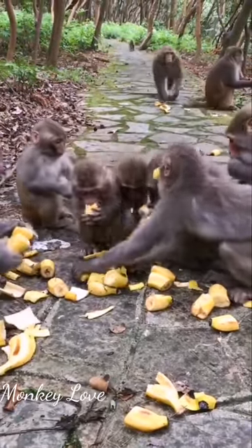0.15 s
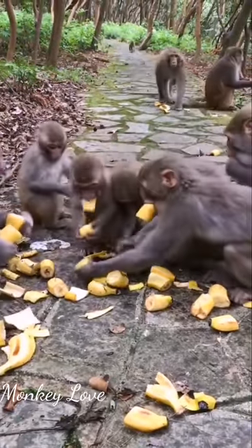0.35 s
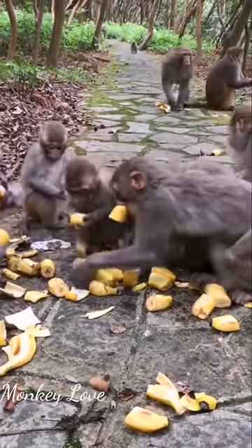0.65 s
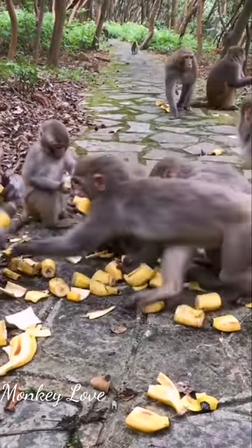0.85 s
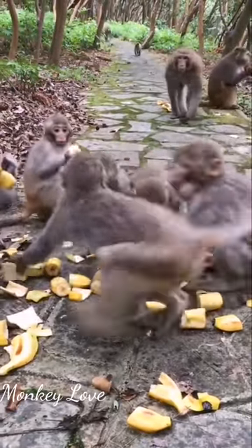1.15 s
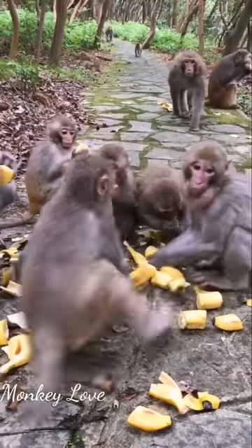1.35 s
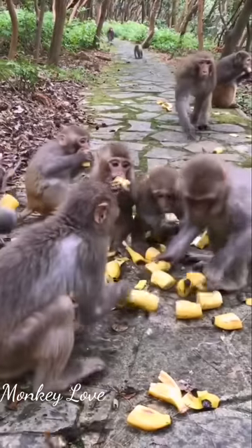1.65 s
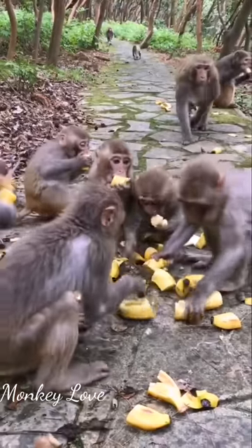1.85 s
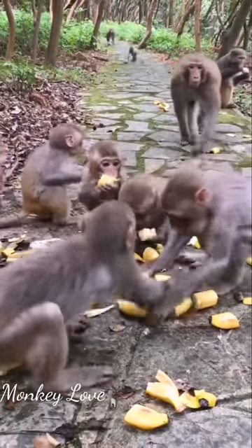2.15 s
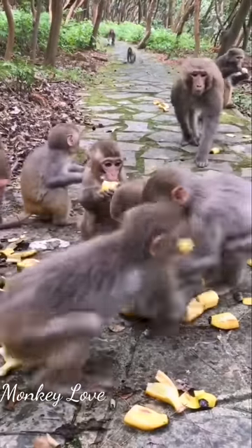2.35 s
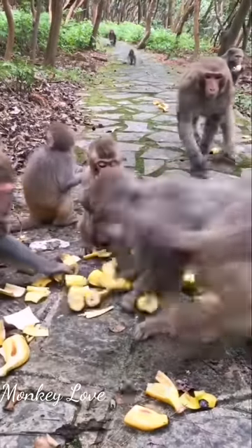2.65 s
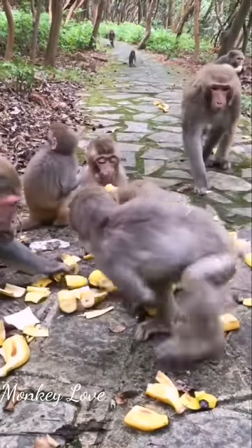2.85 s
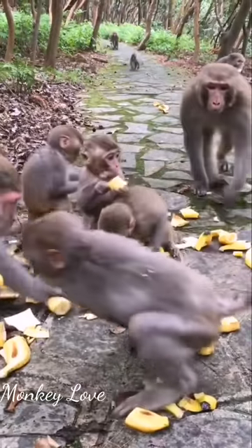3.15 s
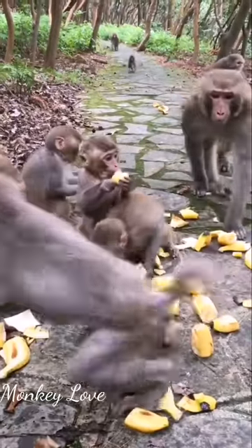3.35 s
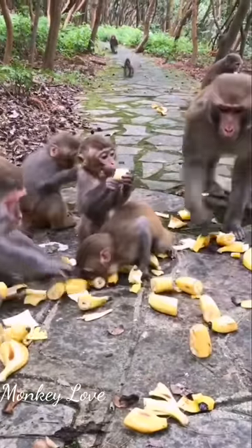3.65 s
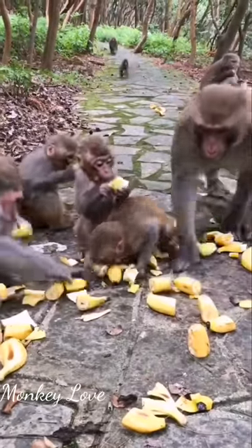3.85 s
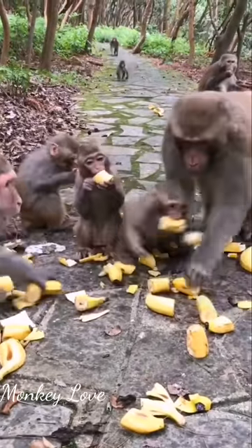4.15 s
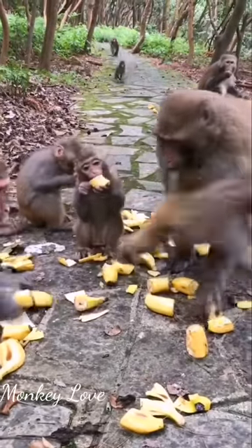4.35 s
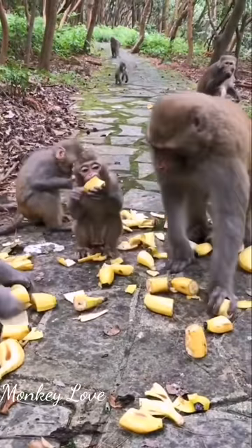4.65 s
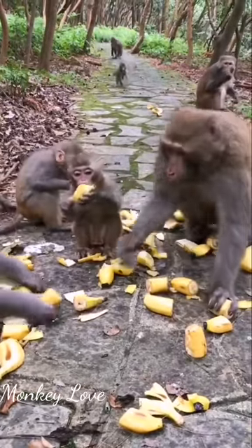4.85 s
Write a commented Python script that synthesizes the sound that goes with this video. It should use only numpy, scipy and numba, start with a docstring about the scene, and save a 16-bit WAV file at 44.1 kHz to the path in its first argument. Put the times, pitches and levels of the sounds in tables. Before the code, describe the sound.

A distant engine idles throughout with a low, throbbing hum under the soft hiss of forest leaves. Close to the microphone, monkeys scuff and shuffle over gritty stone and dry leaves in fits and starts. From about 0.6 to 1.3 seconds one monkey gives a soft, nearly pure coo farther off. Over it, at 0.9 seconds, comes a loud, very short, rasping shriek, followed by quick high squeaks and two dull footfalls. A sharp snap sounds at 1.6 seconds amid heavier shuffling, then two faint squeaks. A thin wavering squeal runs from 2.0 to 2.3 seconds and ends in another squeak. A short harsh bark comes at 3.0 seconds, and another at 3.7 with small squeaks just after. A sharper falling squeak stands out at 4.3 seconds, and light scuffs continue until about 5 seconds.

```python
"""Macaques squabbling on a forest path

Close to the microphone, macaques quarrel over fruit on a stone path. Their squeaks and
shrieks are whistles of the vocal folds that break into a rasp when pressed; in the harsh
little barks, chaotic folds ring the throat. Hands and feet scuff over grit and dry leaves.
Further off one animal coos, and a distant engine idles under the soft hiss of the trees."""
import sys
import numpy as np
from scipy import signal
from scipy.fft import rfft, irfft, next_fast_len
from scipy.io import wavfile
from scipy.ndimage import uniform_filter1d
from numba import njit

SR = 44100
rng = np.random.default_rng(int(sys.argv[2]) if len(sys.argv) > 2 else 0)


def store_wav(level_fs):
    """Save 16-bit WAV to argv[1]."""
    pcm = np.round(np.clip(np.atleast_2d(level_fs), -1, 1) * 32767)
    wavfile.write(sys.argv[1], SR, pcm.T.astype(np.int16))


N = 221173
T = np.arange(N) / SR
RASP_HZ = 990  # slow second vibration of the larynx in rough stretches
TOP_HZ = 15850  # upper edge of the recorder's band


def squeak(t, hz, db, rough, octave_db, air_db, edge_hz, shake_hz=RASP_HZ, shake_depth=0.24):
    """A whistling voice that breaks into a rasp around its first two harmonics when pressed."""
    # resonances of the narrowed throat: (frequency [Hz], width [Hz], gain [dB])
    throat = [(2400, 90, -3.5), (3370, 800, -25), (3880, 780, 5), (5100, 390, -1), (6200, 1100, 3),
              (8700, 670, -3)]
    # colour of the rasp: (frequency [Hz], gain [dB])
    rasp_colour = [(900, -56), (1500, -31), (2100, -4), (4000, -2), (6300, -2.5), (7500, -7), (10000, -10),
                   (12500, 2), (16000, -14)]
    # air forced through the throat: (frequency [Hz], gain [dB])
    air_colour = [(2500, -39), (5200, -14), (6300, 1), (7300, -9), (8100, 7), (9300, -6), (10800, -0.5),
                  (12500, 3.5), (14000, -8), (16000, 7)]
    # the small mouth radiates no bass: (frequency [Hz], gain [dB])
    mouth = [(700, -43), (1150, -4), (1500, 4.5), (16000, -2)]
    n, octave = len(t), undb(octave_db)
    rough = np.clip(rough * undb(wander(n, 247)), 0, 1)
    folds = rasp(n, RASP_HZ, jitter=.065, air=1.0)
    # the second vibration of the larynx shakes the whistle and gives it side tones
    shake = np.sin(turns(shake_hz * (1 + 0.0516 * wander(n, 299))))
    jitter = (0.005 + 0.0795 * rough) * wander(n, 1100)
    phase = turns(hz * (1 + jitter)) + shake_depth * rough * shake
    weights = [1, octave, 0.023 * np.sqrt(octave), 0.084 * octave]
    # overtones die away above the throat's top resonance
    tone = sum(weight * np.sin(k * phase) / (1 + (k * hz / 13000) ** 6) * (k * hz < TOP_HZ)
               for k, weight in enumerate(weights, 1))
    tone = steady(tone) * undb(1.6 * wander(n, 448))
    harsh = resonate(folds, hz, .5 * hz)[0] + 0.38 * octave * resonate(folds, 2 * hz, 3.7 * hz)[0]
    ring = sum(undb(gain_db) * resonate(harsh, f, width)[0] for f, width, gain_db in throat)
    harsh = steady(colour(ring + 0.15 * harsh, rasp_colour))
    voice = steady(np.sqrt(1 - rough ** 2) * tone + rough * harsh, size=260)
    air = colour(rasp(n, RASP_HZ, jitter=0.06, air=2.2), air_colour)
    air = steady(colour(air, [(edge_hz, 0), (1.25 * edge_hz, -15)]))
    return colour(fade(t) * (undb(db) * voice + undb(air_db) * air), mouth)


def shriek():
    """One loud, close cry, cleaner towards its ends and breaking up in the middle."""
    # course of the cry, ahead of the mouth: (time [s], pitch [Hz], level [dB], roughness [0-1],
    # octave over fundamental [dB], air level [dB])
    course = [(.847, 2068, -49, 0.3, -22, -46), (.858, 3060, -20.5, 0.17, 7, -45),
              (.868, 3112, -16.5, 0, 26, -49), (.8705, 2594, -16.5, 0.93, -6, -38),
              (.877, 2006, -16, 0.79, 14, -40), (.885, 2222, -17.5, 0.68, -3.5, -42),
              (.891, 2510, -13.5, 0.6, 23, -27), (.902, 2980, -17.5, 0.7, 34, -28),
              (.914, 2890, -20, 0.05, 8, -28), (.922, 2960, -54, 0.5, -13, -68)]
    out = np.zeros(N)
    t, (hz, db, rough, octave_db, air_db) = controls(course)
    add(out, t[0], squeak(t, hz, db, rough, octave_db, air_db, edge_hz=16400))
    return out


def squeal():
    """A long wavering cry with wide side tones; pressed harder, it carries more rasp and air."""
    # course of the cry, ahead of the mouth: (time [s], pitch [Hz], level [dB])
    course = [(2.03, 3820, -45), (2.036, 3835, -51), (2.05, 4496, -43), (2.064, 4650, -42.5),
              (2.1, 4300, -48), (2.11, 3916, -32), (2.14, 3756, -28.5), (2.196, 5980, -51),
              (2.218, 6140, -50), (2.238, 4840, -40), (2.255, 4930, -45)]
    out = np.zeros(N)
    t, (hz, db) = controls(course)
    rough = 0.16 * undb(0.12 * (db - db.max()))
    add(out, t[0], squeak(t, hz, db, rough, octave_db=-10.5, air_db=db - 7.5, edge_hz=8400,
                          shake_hz=2280, shake_depth=0.25))
    return out


def short_squeaks():
    """Brief close calls: most start strained, swell and clear, then let go in level and pitch."""
    # calls, ahead of the mouth: (peak time [s], rise [s], fall [s], start pitch [Hz], peak pitch [Hz],
    # relaxed pitch [Hz], level [dB], swell [dB], starting roughness [1 = all rasp],
    # octave over fundamental [dB], air over voice [dB], upper edge of the air [Hz])
    calls = [ (.939, 0.018, .008, 2880, 2220, 2600, -42, 8, 0.8, -2, -4, 13000),
             (.948, 0.0036, 0.043, 2750, 2940, 3700, -25, 7, 0.2, 23, -13, 14000),
             (1.032, .057, 0.042, 8000, 5870, 4500, -32, 12, 0.65, -1, -0.5, 16000),
             (1.051, 0.015, 0.027, 4350, 3954, 990, -31, 10, 0.65, -17, -8, 15000),
             (1.799, 0.016, 0.0082, 1500, 2270, 2770, -42.5, 2, 0.2, 10, -4, 11000),
             (1.901, 0.0092, 0.013, 3430, 3440, 3300, -39, -2, 1.1, -9, -11, 9000),
             (2.149, 0.0064, 0.011, 4140, 4400, 4200, -35, 8, .7, -14, 5.5, 6960),
             (2.282, .02, 0.028, 4140, 3880, 1110, -31, 11, 0.54, 0.5, -3, 11300),
             (3.714, .021, .006, 1460, 1830, 3000, -46.5, -1, 0.1, -24, -13, 9000),
             (3.875, 0.051, 0.019, 2140, 2213, 840, -37.5, 15, 0.47, 3, -7, 12000),
             (4.286, 0.00138, .006, 7600, 7100, 5000, -27.5, 10, .45, -14, -6, 10000),
             (4.312, .026, 0.034, 6406, 3450, 1396, -22, 16, 0.82, -7, -12, 9000), ]
    relax_s, release_db = .013, 25
    step_ratio, crack_db = 1.42, -7.5
    out = np.zeros(N)
    for (s, rise, fall, start_hz, peak_hz, end_hz, peak_db, swell_db,
         strain, octave_db, air_db, edge_hz) in calls:
        t = span(s - rise, s + fall)
        rising = np.clip(1 + (t - s) / rise, 0, 1)
        falling = np.clip((t - s) / fall, 0, 1)
        bend = rising ** 2.2  # the pitch holds at first and bends late
        relaxed = 1 - np.exp(-np.maximum(t - s, 0) / relax_s)
        glide_hz = start_hz + (peak_hz - start_hz) * bend + (end_hz - peak_hz) * relaxed
        db = peak_db - swell_db * (1 - rising) - release_db * falling
        # the voice clears at the peak and frays as it dies
        rough = strain * (1 - .7 * bend) * (1 - falling) + .5 * falling
        # the glide sticks on steps and cracks between them
        steps = np.log(glide_hz / peak_hz) / np.log(step_ratio)
        hz = peak_hz * step_ratio ** (steps - np.sin(2 * np.pi * steps) / (2 * np.pi))
        crack = np.sin(np.pi * steps) ** 2
        call = squeak(t, hz, db + crack_db * crack, rough + 0.13 * crack, octave_db, db + air_db, edge_hz)
        add(out, t[0], call)
    return out


def barks():
    """Chaotic folds ring the throat; as the mouth opens, low resonances come in and the hiss drops."""
    # barks: (start [s], attack [s], hold [s], release [s], level [dB], mouth opens after [s],
    # open mouth's low cut [Hz], shut mouth's hiss over voice [dB], jaw shift of resonances [ratio])
    calls = [ (2.986, 0.0024, 0.044, 0.025, -28.5, .024, 786, 5, 1.06),
             (3.709, 0.01, 0.017, 0.013, -29, 0.0113, 454, -6.5, 1.173),
             (3.7615, .0015, 0.01, 0.012, -39, .001, 900, -16, 1.16), ]
    # throat resonances: (frequency [Hz], width [Hz], gain [dB], share of the jaw shift [0-1])
    throat = [(570, 46, 2, 0.17), (992, 110, 7, 0.88), (1423, 133, 6.5, 0.96), (2160, 160, 5, 0.75),
              (3000, 180, 8, 0), (3700, 340, 0, 0.56), (4250, 91, 0, 0.15), (7500, 240, -13, 0)]
    # breathy edge of a bark: (frequency [Hz], gain [dB])
    hiss_colour = [(1500, -7), (4400, 6.5), (6300, -2), (8000, 7.5), (11000, 6.5), (13000, -1), (16000, 1)]
    range_db, opening_s = 19.5, 0.0067
    shut_hz = 2090  # the nearly shut mouth passes only treble
    out = np.zeros(N)
    for s, attack, hold, release, peak_db, opens, open_hz, hiss_db, jaw in calls:
        corners = s + np.cumsum([0, attack, hold, release])
        t = span(s, corners[-1])
        db = peak_db - range_db * np.interp(t, corners, [1, 0, 0, 1])
        openness = .5 + .5 * np.tanh((t - s - opens) / opening_s)
        low_cut_hz = shut_hz + (open_hz - shut_hz) * openness
        folds = rasp(len(t), hz=500, jitter=.2, air=0.32)
        voice = np.zeros(len(t))
        for rest_hz, width, gain_db, share in throat:
            hz = rest_hz * jaw ** share
            # each resonance acts twice, which keeps the valleys between them dark
            ring = resonate(folds, hz, width)[0]
            voice += undb(gain_db) * resonate(ring, hz, 6 * width)[0]
        for _ in range(2):
            voice = resonate(voice, low_cut_hz, low_cut_hz)[1]
        hiss = undb(hiss_db - 10 * openness) * unit(colour(rng.standard_normal(len(t)), hiss_colour))
        add(out, s, fade(t) * undb(db) * steady(steady(voice) + hiss))
    return out


def rasp(n, hz, jitter, air):
    """Uneven slaps of the vocal folds, each with a puff of air."""
    cycle = np.cumsum(hz * np.exp(jitter * wander(n, hz))) / SR
    slaps = np.diff(np.floor(cycle), prepend=0) * undb(7.0 * wander(n, hz))
    puffs = np.exp(-(cycle % 1) / 0.82) * rng.standard_normal(n)
    return unit(slaps) + air * unit(puffs)


def contacts():
    """Short gritty scuffs and the dull pats of feet on the stone, near the microphone."""
    # scuffs, slaps and snapping stalks: (time [s], level [dB], decay [s], band centre [Hz])
    scuffs = [(0.1467, -41, 0.0076, 5600), (0.27, -47, 0.0027, 7000), (0.3271, -35.5, 0.0026, 4800),
              (0.4628, -44.5, 0.0078, 7000), (.693, -44.5, .016, 7000), (0.78, -40.5, 0.01, 6800),
              (1.098, -33.5, 0.0013, 5900), (1.25, -40.5, 0.019, 6000), (1.604, -38, 0.00053, 4860),
              (1.6053, -18, 0.0028, 6030), (1.611, -34.5, 0.011, 5000), (1.72, -41, 0.0037, 5500),
              (2.705, -41, 0.0024, 4300), (2.815, -45.5, 0.0054, 5000), (3.238, -41, .022, 5850),
              (3.4, -49.5, 0.016, 7000), (3.831, -34, 0.02, 7200), (4.069, -43.5, 0.014, 5500),
              (4.374, -42, .0035, 10000), (4.516, -48, .0055, 8100), (4.718, -44.5, .009, 6500),
              (4.7938, -39, 0.01, 4370), (4.805, -40, 0.017, 4600)]
    # soft footfalls: (time [s], peak level [dB], pitch [Hz], half length [s])
    footfalls = [(0.949, -34, 242, 0.0034), (1.012, -29.5, 133, 0.0086), (3.027, -49, 319, 0.017)]
    out = np.zeros(N)
    t = np.arange(-SR // 20, SR // 8) / SR
    for s, db, decay, hz in scuffs:
        scrape = resonate(grit(len(t), rate=5000, spread_db=6), hz, 1.44 * hz)[0]
        add(out, s + t[0], undb(db) * swell(t, 0.45 * decay, decay) * unit(scrape))
    for s, db, hz, half_length in footfalls:
        out += undb(db) * np.exp(-((T - s) / half_length) ** 2) * np.cos(2 * np.pi * hz * (T - s))
    return out


def shuffle():
    """Fur, hands and feet dragging over the path in fits and starts."""
    # bodies dragging: (peak time [s], level [dB], rise [s], decay [s])
    drags = [(.82, -49.5, 0.09, 0.28), (1.29, -42, 0.076, 0.71), (1.545, -38.5, 0.057, 0.049),
             (1.78, -48, 0.066, 0.052), (1.951, -37, 0.083, 0.07), (2.11, -48, 0.062, 0.18),
             (2.29, -39.5, .03, 0.028), (2.6, -56, 0.075, 0.1), (3.3, -60, .06, 0.17),
             (3.5, -64, 0.036, 0.061), (3.86, -45, 0.051, 0.13), (4.02, -52.5, 0.037, 0.36),
             (4.26, -45.5, 0.08, 0.13), (4.61, -46.5, 0.11, 0.094), (4.88, -53, 0.11, 0.97)]
    # rubbed grit and dry leaves: (frequency [Hz], gain [dB])
    rub_colour = [(120, -1), (250, 1.5), (500, -3.5), (1000, -2), (2000, 0), (4000, -1), (6000, -2.5),
                  (8500, -6.5), (12000, -5), (16000, -11)]
    rustle_db = -58  # the troop is never quite still
    drag_power = sum((undb(db) * swell(T - s, rise, decay)) ** 2 for s, db, rise, decay in drags)
    level = np.sqrt(undb(rustle_db) ** 2 + drag_power) * undb(1.6 * wander(N, 70))
    return level * unit(colour(grit(N, rate=3500, spread_db=1.5), rub_colour))


def grit(n, rate, spread_db):
    """Tiny clicks of uneven size, about rate a second, over a smooth rub."""
    size = undb(spread_db * np.minimum(rng.exponential(size=n), 4))
    clicks = (rng.random(n) < rate / SR) * size * rng.standard_normal(n)
    return unit(unit(clicks) + 1.17 * rng.standard_normal(n))


def coo():
    """A macaque further off: a nearly pure call whose pitch holds, then sags at the end."""
    # course of the call: (time [s], pitch [Hz], fundamental [dB], second harmonic [dB])
    course = [(0.62, 683, -63, -76), (0.636, 681, -62, -69), (0.694, 687, -50, -72),
              (0.76, 689, -44.5, -42), (0.816, 681, -40.5, -58), (0.87, 689, -43.5, -46),
              (1.016, 680, -46.5, -70), (1.066, 682.5, -47.5, -61), (1.132, 697, -42, -72),
              (1.17, 654, -52, -63), (1.194, 665.7, -40.5, -57), (1.29, 611, -60, -69)]
    out = np.zeros(N)
    t, (hz, db, second_db) = controls(course)
    phase = turns(hz * (1 + 0.0025 * wander(len(t), 63)))
    voice = undb(db) * np.sin(phase) + undb(second_db) * np.sin(2 * phase)
    add(out, t[0], np.sqrt(2) * fade(t) * voice * undb(.9 * wander(len(t), 50)))
    return out


def engine():
    """A far idling engine: only low multiples of its firing rate carry through the trees."""
    # tones above the lowest hum: (multiple of the firing rate, level [dB])
    tones = [(3, -54.5), (4, -62), (5, -49.5), (6, -55), (7, -61.5), (8, -69.5), (9, -66), (12, -69.5)]
    # brief dips that make the lowest hum throb: (time [s], half length [s])
    hum_dips = [(.44, .11), (1.047, 0.096), (1.612, 0.093), (2.217, 0.084), (2.93, 0.12), (3.575, 0.079),
                (4.19, 0.18), (4.666, 0.16)]
    firing_hz, hum_db, dip_db = 25.48, -41.2, -14
    phase = turns(firing_hz * (1 + 0.00468 * wander(N, 3.99)))
    dips = sum(np.exp(-((T - s) / half_length) ** 2) for s, half_length in hum_dips)
    hum = undb(hum_db + dip_db * dips) * np.cos(2 * phase)
    for k, db in tones:
        hum += undb(db + 1.5 * wander(N, 5.5)) * np.cos(k * phase + wander(N, 3) / 2)
    return np.sqrt(2) * hum


def forest():
    """Far rumble and the soft, gently swelling hiss of leaves."""
    # forest air: (frequency [Hz], relative level [dB])
    air_colour = [(20, -35), (31, -16), (39, 7), (48, -1.5), (75, 2.5), (110, 3), (160, -4.5), (230, -12.5),
                  (320, -14), (480, -22), (1050, -16), (2000, -23), (4500, -29.5), (11000, -39),
                  (16000, -39)]
    level_db = -47
    return unit(colour(rng.standard_normal(N), air_colour)) * undb(level_db + 0.76 * wander(N, 6.8))


def trees(x, wet_db, t60):
    """The direct sound plus up to half a second of thin, dull scatter from the path and the trunks."""
    t = T[:SR // 2]
    tail = grit(len(t), rate=900, spread_db=4) * undb(-60 * t / t60) * (t > .004)
    tail = unit(colour(tail, [(300, 2), (2500, -8.0), (12000, -6.5)])) / np.sqrt(len(t))
    return x + undb(wet_db) * signal.fftconvolve(x, tail)[:N]


def undb(db):
    """Decibels to gain."""
    return 10 ** (np.asarray(db) / 20)


def unit(x):
    """Scale to an rms of one."""
    return x / np.sqrt(np.mean(x ** 2) + 1e-18)


def steady(x, size=180):
    """Hold the rms over size samples at one."""
    return x / np.sqrt(np.abs(uniform_filter1d(x ** 2, size)) + 1e-12)


def wander(n, rate):
    """Random drift with a spread near one and about rate turns a second."""
    knots = rng.standard_normal(n + 2)
    return 1.2 * np.interp(np.arange(n) * min(rate / SR, 1), np.arange(n + 2), knots)


def colour(x, points):
    """Filter by a curve of (frequency [Hz], gain [dB]) points."""
    hz, db = np.transpose(points)
    size = next_fast_len(len(x) + 1024)
    bin_hz = np.maximum(np.fft.rfftfreq(size, 1 / SR), 1)
    gain = undb(np.interp(np.log(bin_hz), np.log(hz), db))
    return irfft(rfft(x, size) * gain, size)[:len(x)]


@njit
def svf(x, tuning, damping):
    """State-variable filter retuned every sample: band and high outputs."""
    band, high = np.empty(len(x)), np.empty(len(x))
    band_state, low_state = 0., 0.
    for i in range(len(x)):
        g, k = tuning[i], damping[i]
        v = (band_state + g * (x[i] - low_state)) / (1 + g * (g + k))
        low = low_state + g * v
        band[i], high[i] = k * v, x[i] - k * v - low
        band_state, low_state = 2 * v - band_state, 2 * low - low_state
    return band, high


def resonate(x, hz, width):
    """The pair (band-passed, high-passed) for a still or moving resonance."""
    hz = np.clip(hz + np.zeros(len(x)), 10, .45 * SR)
    return svf(x, np.tan(np.pi * hz / SR), width / hz)


def turns(hz):
    """Running phase in radians."""
    return 2 * np.pi * np.cumsum(hz) / SR


def span(start, end):
    """Sample times between two moments."""
    return T[(T >= start) & (T <= end)]


def controls(rows):
    """Sample times of a call and its columns joined by straight lines."""
    times, *columns = np.transpose(rows)
    t = span(times[0], times[-1])
    return t, [np.interp(t, times, column) for column in columns]


def fade(t):
    """A millisecond's fade at both ends of a call."""
    return np.clip(np.minimum(t - t[0], t[-1] - t) / .001, 0, 1)


def swell(t, rise, decay):
    """A level that grows to one at time zero and dies away."""
    return np.exp(np.minimum(t / rise, -t / decay))


def add(out, start, x):
    """Mix x into out from a time in seconds."""
    i = max(int(start * SR), 0)
    out[i:i + len(x)] += x[:max(N - i, 0)]


def scene():
    """One microphone by the path: the troop close, the coo further off, engine and forest behind."""
    troop = contacts() + shuffle() + shriek() + squeal() + short_squeaks() + barks()
    near = trees(troop, wet_db=-14.5, t60=0.16)
    far = trees(coo(), wet_db=-15, t60=1.0)
    return (near + far + engine() + forest())[None]


def record(dry):
    """The recorder rounds the very highest peaks and cuts the top steeply."""
    rounded = dry / (1 + (dry / .8) ** 6) ** (1 / 6)
    return signal.sosfilt(signal.ellip(10, .2, 70, TOP_HZ, fs=SR, output="sos"), rounded)


dry = scene()
out = record(dry)
store_wav(out)
```